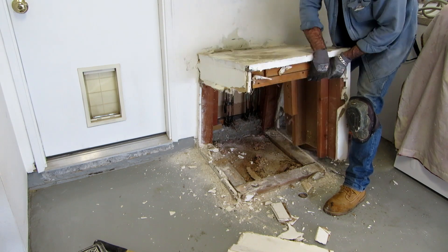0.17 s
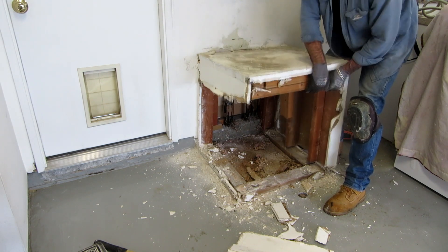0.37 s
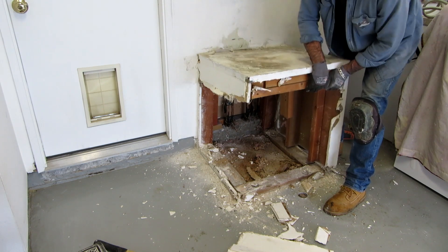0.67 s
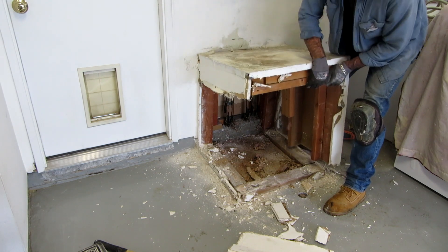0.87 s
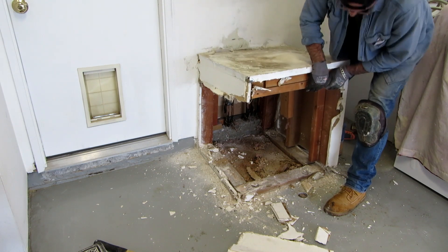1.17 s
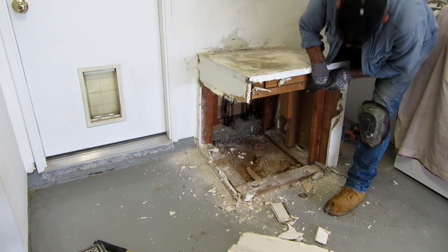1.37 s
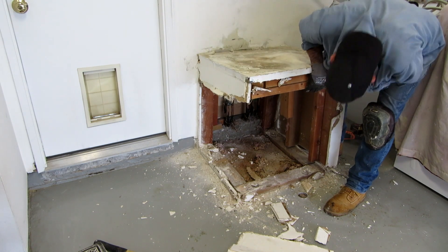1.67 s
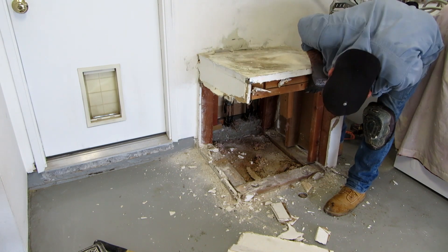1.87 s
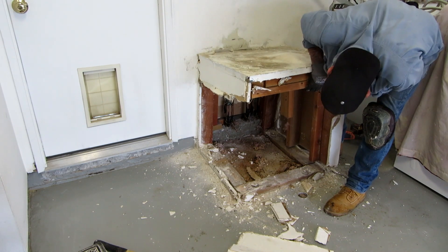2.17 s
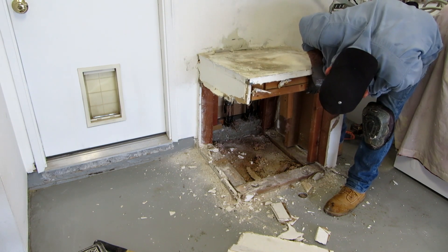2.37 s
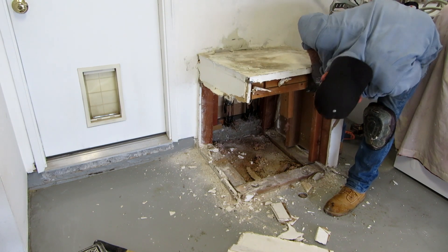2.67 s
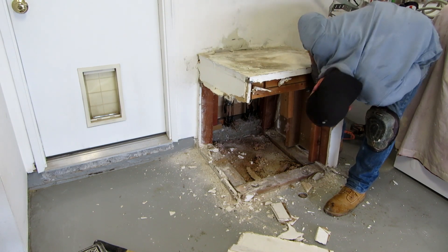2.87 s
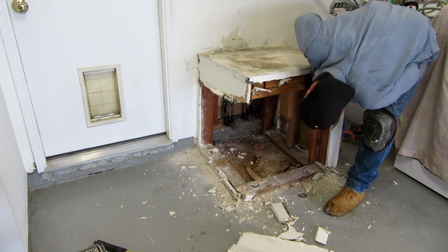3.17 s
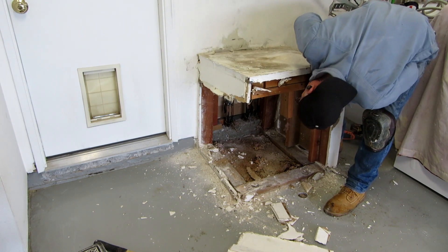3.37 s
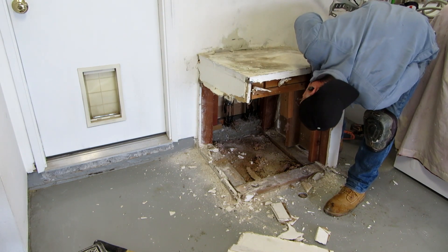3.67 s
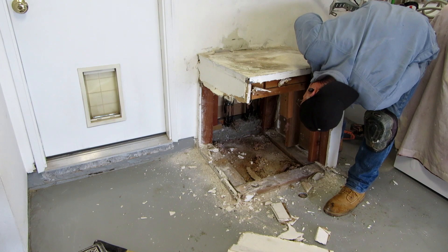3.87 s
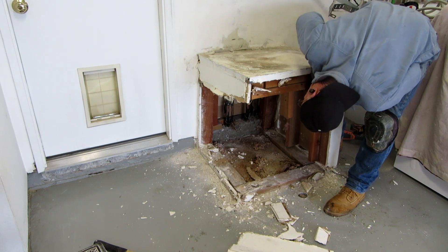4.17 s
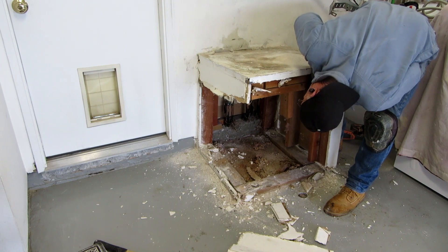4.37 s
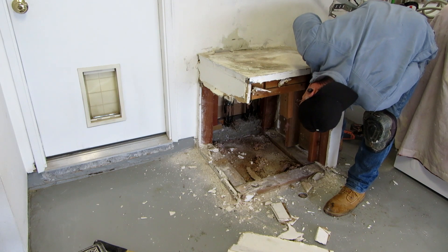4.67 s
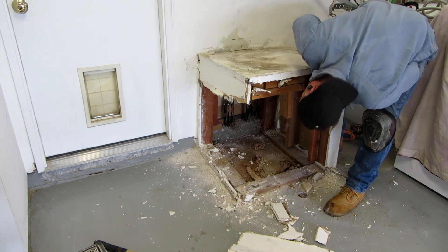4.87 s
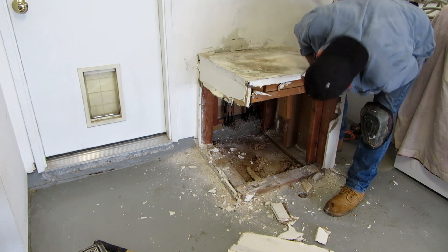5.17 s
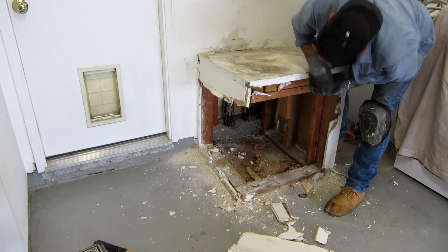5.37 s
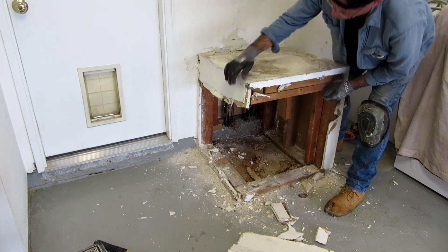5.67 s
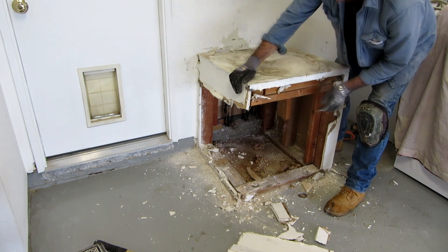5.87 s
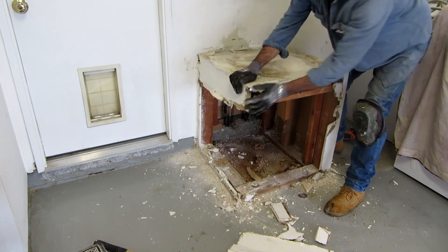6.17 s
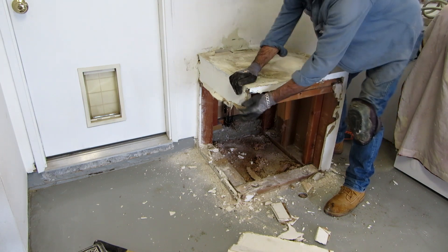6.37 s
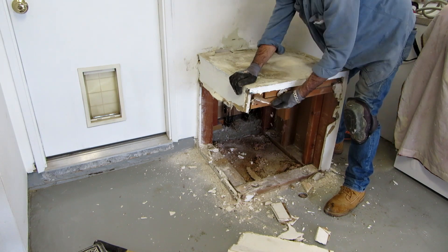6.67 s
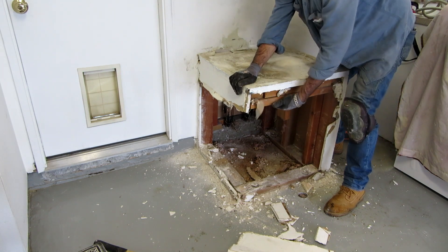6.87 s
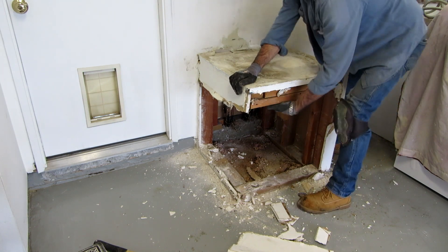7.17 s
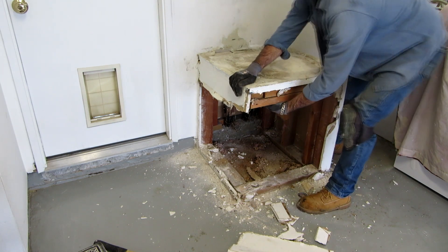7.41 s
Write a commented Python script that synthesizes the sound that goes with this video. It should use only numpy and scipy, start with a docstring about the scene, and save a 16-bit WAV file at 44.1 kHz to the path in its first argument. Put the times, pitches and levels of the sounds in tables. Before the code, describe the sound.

In a garage, hands rock a boxed shelf, and its plasterboard grinds and tears in short, gritty strokes with soft booms and a few sharp snaps. After a lull and more grinding, nails creak loudly out of the wooden frame in jolts and stuttering runs. Scraps click down, and a thin scrape comes last. The work is centred, with a short wall echo over faint distant traffic.

```python
"""In a garage with a concrete floor, hands rock a boxed shelf of plasterboard and studs and wrench it loose.
First the board grinds and tears along the wall: tiny fractures make it ring, and it booms as it flexes.
Then nails creak out of the wood in single slips. Scraps snap and drop, hands and boots brush them,
and a thin scrape comes last. The walls echo the work, far traffic murmurs through the door,
and a low rumble and a thin, high whine go on throughout."""
import sys
import numpy as np
from scipy import signal
from scipy.fft import rfft, irfft
from scipy.io import wavfile

SR = 44100
rng = np.random.default_rng(int(sys.argv[2]) if len(sys.argv) > 2 else 0)


def transcribe(u):
    """Save the signal u as a 16-bit wav file named by the first command-line argument.

    u: samples, shape (n,) or (channels, n), limited to [-1, 1]; the rate is SR.
    q: integer samples, one column per channel.
    """
    v = np.clip(np.atleast_2d(u).T, -1, 1)
    q = np.round(v * 32767).astype(np.int16)
    wavfile.write(sys.argv[1], SR, q)


N = 332514

# Strokes of work: start_s, rise_s, fall_s, treble_peak_db, middle_vs_treble_db, ring_hz, ring_db
ROCKING_STROKES = [(0.069, .02, 0.016, -34.5, -3.5, 1375, -38), (0.095, 0.041, 0.065, -24.5, -1, 4340, -21),
                   (0.125, 0.076, 0.081, -15.5, -5.5, 3040, -23.5),
                   (0.2, 0.042, 0.041, -22.5, 2.5, 1207, -21), (0.29, 0.075, 0.035, -30, 2, 6260, -38),
                   (0.386, 0.038, .03, -21, -3, 3070, -26.5), (0.43, .01, 0.065, -21.5, -2.5, 2030, -35),
                   (0.568, 0.041, 0.049, -26, -2.5, 838, -31.5),
                   (0.69, 0.0086, 0.066, -31.5, -2, 3600, -48), (0.746, 0.012, 0.07, -30, 2, 840, -42),
                   (0.87, 0.064, 0.08, -27, -1.5, 830, -33), (1.033, 0.012, 0.075, -28.5, 1.5, 6300, -39),
                   (1.139, 0.047, 0.024, -28, -1, 4080, -38), (1.249, 0.031, 0.071, -31.5, -1, 1280, -54),
                   (1.92, 0.018, 0.0089, -40, 2, 1000, -52), (1.945, 0.0081, 0.17, -31, 0.5, 990, -36),
                   (2.047, 0.0061, 0.061, -32, 3, 875, -39), (2.208, 0.063, 0.049, -25.5, -1, 850, -41),
                   (2.366, 0.066, 0.076, -25.5, -1.5, 1390, -33.5),
                   (2.519, 0.044, 0.051, -22, -3, 1440, -26.5), (2.649, 0.025, 0.061, -27, -2.5, 983, -36),
                   (3.93, 0.0027, 0.05, -21.5, 0.5, 1017, -25.5),
                   (3.973, 0.053, 0.044, -22, 0.5, 2580, -32), (4.03, 0.031, 0.071, -24, 1, 1070, -30),
                   (4.243, 0.064, 0.054, -19, -2.5, 1550, -20), (4.397, .016, 0.091, -20, -2.5, 1970, -28),
                   (4.572, .01, 0.039, -20.5, -5, 1050, -25.5),
                   (4.679, 0.02, 0.054, -25.5, -1, 1020, -27.5)]
WRENCHING_STROKES = [(4.955, 0.022, .01, -28.5, 2.5, 1010, -43),
                     (4.976, 0.0078, 0.18, -16.5, -2.5, 4030, -47), (5.048, 0.0037, 0.28, -19, 4, 777, -28),
                     (5.452, .002, 0.026, -24.5, -3.5, 4340, -46),
                     (5.482, 0.0054, .07, -24.5, 3.5, 690, -39), (5.557, 0.054, 0.17, -23.5, 6, 810, -35),
                     (5.787, .003, 0.078, -29.5, 4, 690, -42), (5.848, 0.085, 0.078, -21, 7, 2070, -30),
                     (6.2, 0.011, .005, -25.5, 0.5, 4340, -40), (6.211, 0.0022, 0.14, -16, 0, 4420, -32)]
BRUSHING_STROKES = [(2.88, 0.0068, 0.064, -55.5, 5, 1010, -53), (2.17, 0.012, 0.037, -45.5, 2, 2000, -55),
                    (3.2, .01, .03, -66, -5, 7600, -62), (3.255, .005, .03, -53.5, 4.5, 660, -48),
                    (4.865, 0.0046, 0.026, -44, -7, 4100, -57), (3.6, .024, 0.054, -61, -9, 7600, -62),
                    (6.661, 0.0075, 0.067, -39.5, 7.5, 1004, -31), (6.872, .003, 0.023, -45, 3, 668, -35),
                    (6.96, 0.029, .025, -46, -16, 4130, -64), (7.04, .005, 0.053, -50, -12, 1810, -45),
                    (7.256, .003, 0.078, -41.5, -11, 1290, -41)]
# Overall tone of the plasterboard and of the wooden frame: pitch_hz, level_db
BOARD_TONE = [(65, -50), (110, -16), (188, -15), (245, -18), (370, -12), (494, -12), (843, 0), (1220, -2),
              (6070, -8), (10500, -17),         (15000, -31)]
FRAME_TONE = [(65, -53), (110, -13), (346, -13.5), (514, -9.5), (748, -2), (2030, -8), (2400, -14),
              (4400, -10), (9500, -23.5), (16000, -41.5)]
# Pitches at which each one rings: pitch_hz, width_hz, level_db
BOARD_RINGS = [(192, 20, 0), (361, 40, 2), (620, 80, -1), (856, 70, -3), (1300, 300, -3), (2080, 130, 0),
               (2750, 250, -2), (3590, 150, -2), (4120, 220, 2.5), (5700, 200, -2), (6500, 150, -2),
               (7600, 200, 0)]
FRAME_RINGS = [(197, 25, 4), (345, 30, 3), (760, 200, 2), (1010, 40, 2), (1360, 110, 1), (2000, 90, 2),
               (3050, 300, -2), (4340, 240, 6.5), (4950, 250, 1), (6250, 150, 1), (7400, 350, 3),
               (9400, 400, 3)]
# Tone of the side signal (what differs between left and right): pitch_hz, gain_db
STEREO_WIDTH = [(60, -8), (110, -1.5), (200, -5), (380, -1.5), (700, -5.5), (1290, -5.5), (2380, -2),
                (4400, 0.5), (8120, 5), (15000, 8)]


def from_db(db):
    """Turn decibels into a gain."""
    return 10 ** (np.asarray(db) / 20)


def rms_one(x):
    """Scale a sound to an average (rms) level of 1."""
    return x / np.sqrt(np.mean(x ** 2) + 1e-20)


def at_hz(points, hz):
    """Read a table of pitch_hz, value between its rows, on a log pitch scale."""
    pitches, values = np.transpose(points)
    return np.interp(np.log(hz + 1), np.log(pitches), values)


def in_time(points):
    """Read a table of time_s, value at every sample."""
    return np.interp(np.arange(N) / SR, *np.transpose(points))


def drift(rate_hz):
    """A smooth random wobble, about 1 in size."""
    r = np.exp(-80 * np.pi * rate_hz / SR)   # one step every 40 samples
    slow = signal.lfilter([1], [1, -2 * r, r * r], rng.standard_normal(N // 40 + 2002))[2000:]
    return np.interp(np.arange(N) / 40, np.arange(len(slow)), rms_one(slow))


def colour(x, tone):
    """Filter a sound so that it takes on the tone in a table."""
    cepstrum = irfft(np.log(from_db(at_hz(tone, np.fft.rfftfreq(8192, 1 / SR)))))
    cepstrum[1:4096] *= 2   # folded so that nothing rings before its cause
    cepstrum[4097:] = 0
    response = irfft(np.exp(rfft(cepstrum)))[:4096]
    return signal.oaconvolve(x, response)[:len(x)]


def resonate(x, hz, width_hz):
    """Ring at one pitch; a narrower ring lasts longer."""
    r = np.exp(-np.pi * width_hz / SR)
    feedback = [1, -2 * r * np.cos(2 * np.pi * hz / SR), r * r]
    return signal.lfilter(np.array([1, 0, -1]) * (1 - r * r) / 2, feedback, x)


def band_filter(x, order, hz, kind):
    """Keep the highs, the lows or a band; a higher order cuts more steeply."""
    return signal.sosfilt(signal.butter(order, hz, kind, fs=SR, output="sos"), x)


def three_bands(x):
    """Split a sound into treble, middle and bass."""
    bands = [(2300, "high"), ([480, 2300], "band"), (480, "low")]
    return np.array([band_filter(x, 3, hz, kind) for hz, kind in bands])


def body(force, tone, rings, ring_db, wander_db):
    """A force shakes board or wood; each ring's strength wanders as the contact moves."""
    out = force.copy()
    for hz, width_hz, level_db in rings:
        wander = wander_db * np.tanh(drift(6))
        out += resonate(force * from_db(level_db + ring_db + wander) + 1e-18, hz, width_hz)
    return colour(out, tone)


def stroke_gains(strokes, fade_s, bass_db):
    """Treble, middle and bass gains: a stroke bites at once, swells, sags and dulls, then lets go."""
    bite_db, sag_db, dulling_db = -5, -13.5, 6
    t, gain = np.arange(N) / SR, np.zeros((2, N))
    for start, rise, fall, peak_db, middle_vs_treble_db, *_ in strokes:
        corners_s = start + np.cumsum([0, rise, fall])
        treble_db = peak_db + np.array([bite_db, 0, sag_db])
        middle_db = treble_db + middle_vs_treble_db + np.array([0, 0, dulling_db])
        now = slice(round(start * SR), round((corners_s[-1] + .1) * SR))
        fade = np.exp(-np.maximum(t[now] - corners_s[-1], 0) / fade_s)
        levels = [np.interp(t[now], corners_s, from_db(db)) for db in (treble_db, middle_db)]
        gain[:, now] = np.maximum(gain[:, now], fade * levels)
    return gain[0], gain[1], gain[1] * from_db(bass_db)


def grit(per_s, spread_db):
    """Tiny fractures click at random, a few of them large."""
    sizes = from_db(spread_db * np.minimum(rng.exponential(1, N), 5)) * rng.choice([-1, 1], N)
    happens = rng.random(N) < per_s * from_db(3 * drift(40)) / SR
    return sizes * happens


def rubbed(strokes, tone, rings, per_s, spread_db, ring_db, bass_db):
    """Grit shakes a body, and the strokes set how loud it is."""
    bands = three_bands(body(grit(per_s, spread_db), tone, rings, ring_db, wander_db=7))
    gains = stroke_gains(strokes, fade_s=0.023, bass_db=bass_db)
    return sum(gain * rms_one(band) for gain, band in zip(gains, bands))


def swelling_rings(moments):
    """Grit rings at one pitch for each moment, swelling and fading."""
    out, force = np.zeros(N), grit(per_s=5000, spread_db=3.6)
    for start_s, length_s, hz, level_db in moments:
        start, count = round(start_s * SR), round(length_s * SR)
        ring = rms_one(resonate(force[start:start + count], hz, hz / 15.6))
        out[start:start + count] += from_db(level_db) * ring * np.hanning(count) ** .5
    return out


def struck(hits, tone, rings, chatter_s, ring_db, gain_db):
    """Each hit is a click with a short dying chatter that shakes a body."""
    times_s, treble_db, lower_vs_treble_db = np.transpose(hits)
    clicks, at = np.zeros((2, N)), np.round(times_s * SR).astype(int)
    clicks[:, at] = from_db([treble_db, treble_db + lower_vs_treble_db])
    decay = np.exp(-1 / (chatter_s * SR))
    chatter = signal.lfilter([1], [1, -decay], clicks + 1e-18) * rng.standard_normal(N)
    upper, lower = clicks + .5 * chatter
    force = three_bands(upper)[0] + three_bands(lower)[1:].sum(axis=0)
    return from_db(gain_db) * body(force, tone, rings, ring_db, wander_db=2.5)


def far_traffic():
    """Traffic murmurs through the door as dull noise; gives centre and side."""
    # Level of the dull background murmur, which swells around the loud work: time_s, level_db
    murmur_levels = [(0.0, -41.5), (0.25, -52), (1.11, -41.5), (1.55, -53.5), (2.56, -44.5), (2.81, -47.5),
                     (3.88, -43), (4.18, -39.5), (4.68, -42), (5.84, -34.5), (6.49, -43), (7.54, -40.5)]
    # Its tone: pitch_hz, level_db
    tone = [(35, -44), (60, -61), (117, -10), (186, -20.5), (209, -17), (364, -15), (503, -17), (663, -4.5),
            (711, -7), (875, -7), (1210, -8), (1520, -9.5), (2910, -22), (15000, -41)]
    level_db = in_time(murmur_levels)
    centre, side = [rms_one(colour(rng.standard_normal(N), tone)) * from_db(level_db + drift(28))
                    for _ in range(2)]
    return np.array([centre, from_db(.5) * colour(side, STEREO_WIDTH)])


def low_rumble():
    """Very deep noise rises and falls; gives centre and side."""
    # How loud the rumble is: time_s, level_db
    loudness = [(0.0, -56.5), (1.93, -78.5), (2.1, -54), (2.41, -78), (2.52, -49), (2.79, -74), (3.84, -66),
                (4.05, -60), (4.93, -65), (5.08, -45), (5.46, -55), (6.03, -50), (6.09, -66), (6.28, -46),
                (6.49, -66), (7.2, -61), (7.37, -53), (7.54, -56)]
    noise = rms_one(band_filter(rng.standard_normal((2, N)), 2, [14, 40], "band"))
    centre, side = noise * from_db(in_time(loudness) + 5.1 * drift(5.1))
    return np.array([centre, side / 2.5])


def thin_whine(pitch_hz=15735, level_db=-67.5):
    """One faint, very high tone whose level flickers."""
    return np.sin(2 * np.pi * pitch_hz * np.arange(N) / SR) * from_db(level_db + 3.7 * drift(15))


def board_tearing():
    """The rocked plasterboard grinds along the wall in dense, tiny fractures."""
    return rubbed(ROCKING_STROKES, BOARD_TONE, BOARD_RINGS,
                  per_s=6000, spread_db=2, ring_db=-7.5, bass_db=-13)


def stroke_singing():
    """Each stroke brings out one ringing pitch of its own."""
    strokes = ROCKING_STROKES + WRENCHING_STROKES + BRUSHING_STROKES
    return swelling_rings([(s, rise + fall, hz, db) for s, rise, fall, _, _, hz, db in strokes])


def panel_booms(pitch_hz=174, length_s=0.1):
    """The panel booms as it flexes."""
    # Each flex: start_s, level_db
    flexes = [(0.12, -41), (0.2, -39), (0.44, -44), (0.76, -49), (0.91, -48), (1.289, -51), (2.42, -47),
              (3.989, -37.5), (4.29, -43)]
    return swelling_rings([(s, length_s, pitch_hz, db) for s, db in flexes])


def falling_scraps():
    """Scraps of board click as they snap or land."""
    # Each snap or landing: start_s, treble_db, lower_vs_treble_db
    snaps = [(1.9475, -17, 3.5), (2.4656, -7, 11.5), (3.2614, -30, 2), (3.9335, -12, -17),
             (4.6872, -2.5, 0), (6.4665, -19.5, -8), (6.6722, -15, -6), (6.6947, -8.5, -1),
             (6.8753, -34, 13), (6.9894, -43, -8), (7.2562, -10.5, 1.5), (7.2624, -22, 20.5),
             (7.2724, -32, -6), (7.3044, -13.5, -7)]
    return struck(snaps, BOARD_TONE, BOARD_RINGS, chatter_s=0.0049, ring_db=-19, gain_db=0.5)


def scrap_brushing():
    """Hands and boots brush the scraps, with sparser grit."""
    return rubbed(BRUSHING_STROKES, BOARD_TONE, BOARD_RINGS,
                  per_s=1500, spread_db=2, ring_db=-5.5, bass_db=-5)


def frame_wrenching():
    """The wooden frame grinds as it is wrenched loose."""
    return from_db(-3) * rubbed(WRENCHING_STROKES, FRAME_TONE, FRAME_RINGS,
                                per_s=4900, spread_db=3, ring_db=-12, bass_db=-10)


def nail_creaks(spread_db=2, lower_vs_treble_db=-9):
    """Nails slip and jolt the frame, singly or in runs whose gaps widen as the pull tires."""
    # Single slips: start_s, treble_db, lower_vs_treble_db
    single_slips = [(4.9751, -21, -24), (5.0572, -3, -1.5), (5.2776, -7, -7), (5.4829, -5.5, -2),
                    (5.5575, -8.5, -1.5), (5.7872, -6.5, -0.5), (5.8466, -12.5, 1.5), (6.2151, -2.5, 1),
                    (6.2324, -4.5, -24), (6.318, -24, -12)]
    # Runs of slips: start_s, end_s, first_gap_s, last_gap_s, treble_db
    runs = [(5.075, 5.245, .0215, .026, -7), (5.607, 5.725, .035, .041, -8),
            (5.863, 5.992, .014, .0175, -6)]
    slips = []
    for start_s, end_s, first_gap_s, last_gap_s, treble_db in runs:
        time_s = start_s
        for louder_db, duller_db in spread_db * rng.standard_normal((16, 2)):
            if time_s <= end_s:
                slips.append((time_s, treble_db + louder_db, lower_vs_treble_db + duller_db))
            time_s += np.interp(time_s, [start_s, end_s], [first_gap_s, last_gap_s])
    slips += list(single_slips)
    return struck(slips, FRAME_TONE, FRAME_RINGS, chatter_s=0.0066, ring_db=4.5, gain_db=10)


def thin_scrape():
    """Smooth noise rings at a few high pitches."""
    # How loud the scrape is: time_s, level_db
    loudness = [(7.31, -46), (7.448, -36), (7.54, -56)]
    # Where it rings: pitch_hz, width_hz, level_db
    rings = [(3950, 130, -5), (4900, 200, 0), (5950, 300, -9), (8700, 2000, -19)]
    noise = rng.standard_normal(N)
    ringing = sum(from_db(db) * resonate(noise, hz, width) for hz, width, db in rings)
    started = np.arange(N) / SR > loudness[0][0]
    return rms_one(ringing) * from_db(in_time(loudness)) * started


def garage_echo(fade_in_s):
    """The walls answer a click with noise that dies away band by band."""
    # Time the echo takes to fall by 60 dB: pitch_hz, decay_s
    decay_times = [(150, 0.25), (500, 0.4), (1400, 0.48), (3700, 0.43), (9700, 0.35), (15000, 0.045)]
    t, out = np.arange(SR * 3 // 4) / SR, 0
    edges_hz = 100 * 2 ** np.arange(0, 7.6, .5)
    for low, high in zip(edges_hz, edges_hz[1:]):
        band = band_filter(rng.standard_normal(len(t)), 2, [low, high], "band")
        fall = from_db(-60 * t / at_hz(decay_times, np.sqrt(low * high)))
        out = out + band * fall / np.sqrt(np.sum(fall ** 2))
    return out * np.clip(t / fade_in_s, 0, 1)


def scene():
    """All work sounds come from the centre; the walls spread them, more so in the treble."""
    work = board_tearing() + frame_wrenching() + scrap_brushing() + nail_creaks() + falling_scraps()
    work += thin_scrape() + stroke_singing() + panel_booms()
    work = band_filter(work, 6, 145, "high")   # boards this small give no deep bass
    far_centre, far_side = far_traffic() + low_rumble()
    echo = signal.fftconvolve(work, garage_echo(fade_in_s=0.00067))[:N]
    centre = from_db(1) * work + from_db(-1) * echo + far_centre + thin_whine()
    # the first bounces differ left and right
    bounces = rng.standard_normal(2000) * np.exp(-np.arange(2000) / 140)
    side_echo = from_db(-11) * garage_echo(fade_in_s=0.0054)
    side_echo[:2000] += from_db(-11) * bounces / np.linalg.norm(bounces)
    side = colour(signal.fftconvolve(work, side_echo)[:N], STEREO_WIDTH) + far_side
    return from_db(-3.5) * np.array([centre + side, centre - side])


def record(dry):
    """The very highest treble is cut steeply."""
    stop_hz, cut_db = 16250, 70
    return signal.sosfilt(signal.cheby2(16, cut_db, stop_hz, fs=SR, output="sos"), dry)


dry = scene()
out = record(dry)
transcribe(out)
```